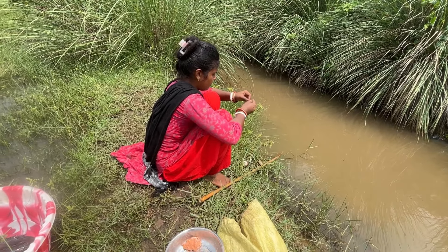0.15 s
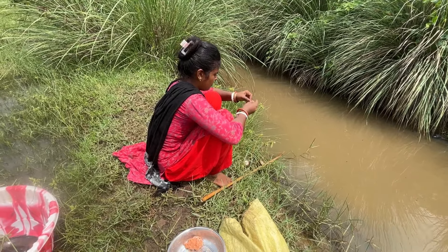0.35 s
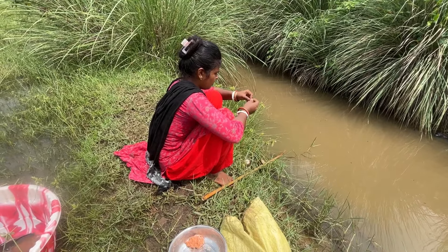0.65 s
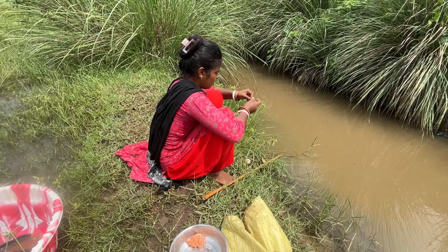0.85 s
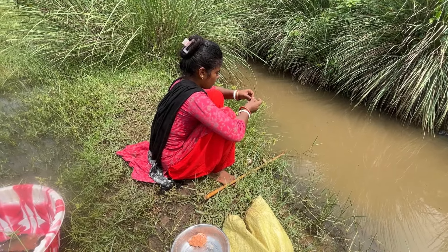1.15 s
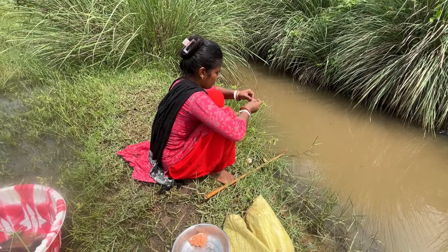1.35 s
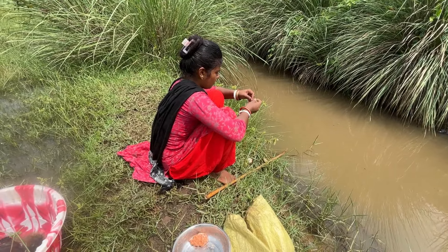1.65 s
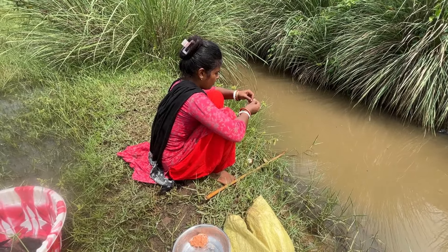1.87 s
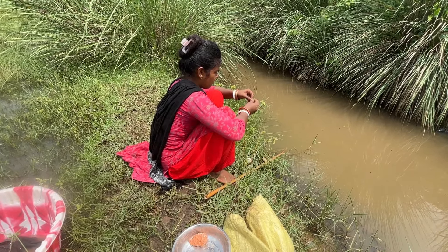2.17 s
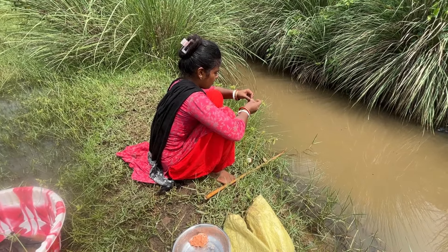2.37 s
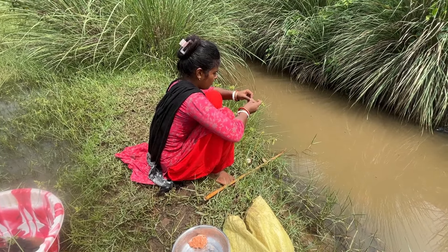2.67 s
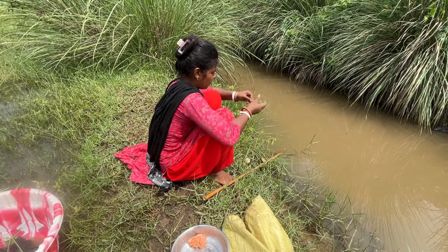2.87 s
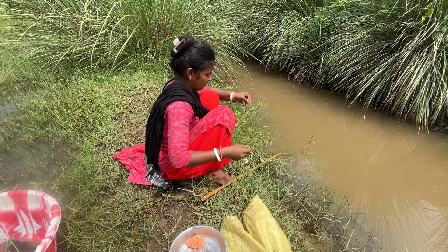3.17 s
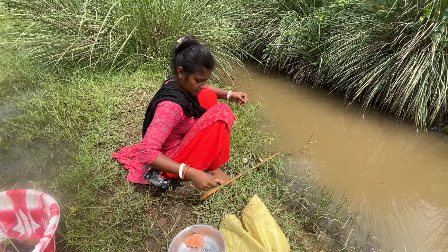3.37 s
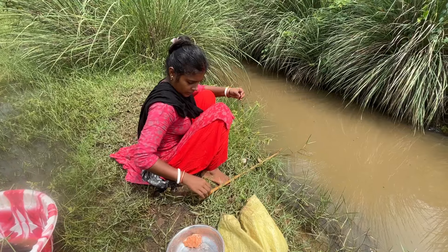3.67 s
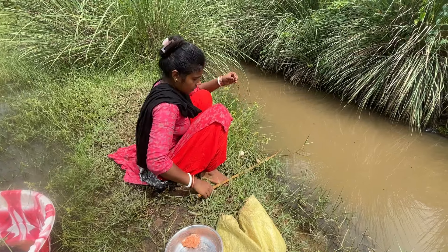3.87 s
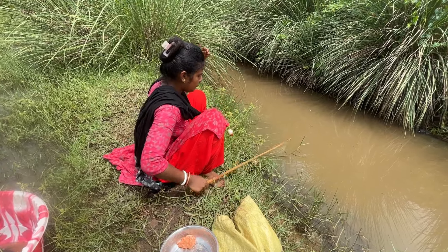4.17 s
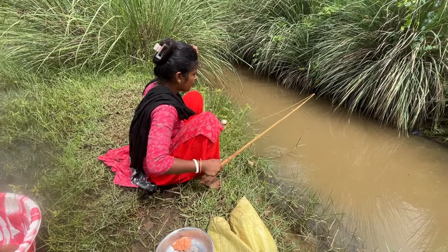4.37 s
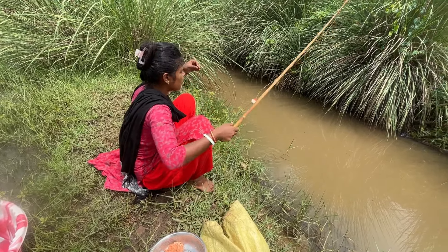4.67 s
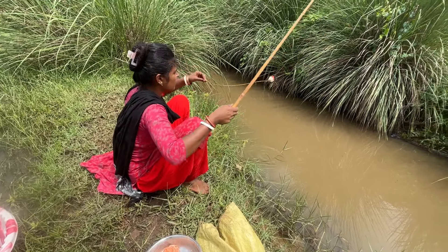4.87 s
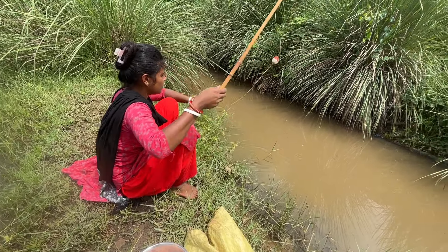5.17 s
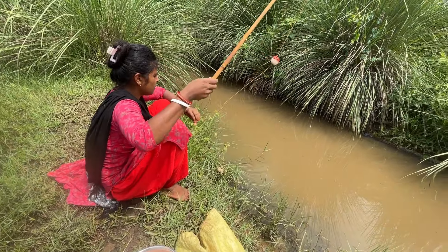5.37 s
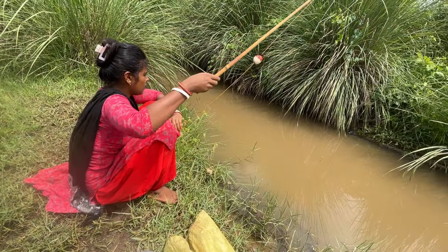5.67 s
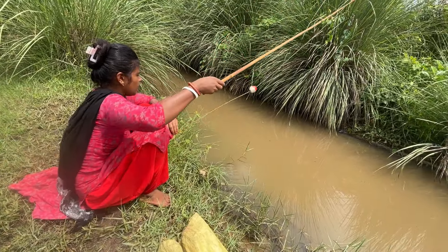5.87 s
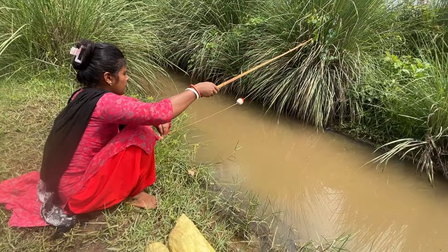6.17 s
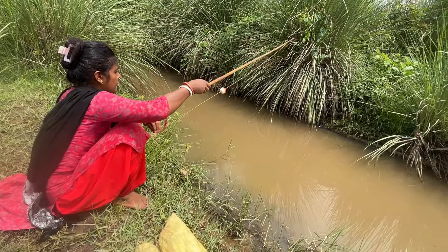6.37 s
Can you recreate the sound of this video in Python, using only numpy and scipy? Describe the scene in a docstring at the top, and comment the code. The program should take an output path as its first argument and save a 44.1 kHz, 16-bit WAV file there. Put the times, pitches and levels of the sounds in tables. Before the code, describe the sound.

A hushed outdoor canal bank in close stereo, with faint rumble, light breeze and thin high insect sounds: chirping crickets, swelling buzzes that stop short, a throbbing buzz that drops away around 1.4 s and slowly returns, and a repeating trill ending in short notes. Clear water drops plink at 0.6 and 0.8 s, a weaker one at 1.3. Around 1.65-2.0 s a cluster of plops comes with a small slosh and spray. Then mostly calm, with a tiny upward bubble chirp at 2.45. At 4.1-4.6 s dull woody rod knocks and a brief grass rustle are heard, another knock at 5.2; drips and ticks multiply from 4.7, including a bright tick at 4.9. Water stirs gently from 5.45 and grows after 5.9. At 6.23 s a loud, sharp, cracking splash bursts out, followed by sloshing, pattering spray and ringing drops until the end at about 6.6 s.

```python
"""A quiet grassy canal bank, heard by two microphones a hand apart.
On the left water drips, plops and sloshes (ringing bubbles, banded noise) and at last bursts into a sharp
splash; a rod knocks (three modes) and grass rustles (fine noise). Crickets (wing-stroke notes), buzzers
(resonated ticks) and a caller (trill and notes) sing in the reeds.
A far rumble (resonated noise), light wind and air (banded noise) lie below."""
import sys
import numpy as np
from scipy import signal
from scipy.fft import rfft, irfft
from scipy.io import wavfile

SR = 44100
rng = np.random.default_rng(int(sys.argv[2]) if len(sys.argv) > 2 else 0)


def rack_gain(trim_db):
    """Turn a fader trim in dB into the linear factor to multiply a signal by."""
    fader = np.asarray(trim_db, float)
    return 10 ** (fader / 20)


def wav_record(signal):
    """Record a signal, one row per channel, as 16-bit PCM in the file named by sys.argv[1]."""
    frames = np.transpose(np.atleast_2d(signal))
    bounded = np.clip(frames, -1, 1)
    # unit amplitude maps onto the largest positive 16-bit level
    quanta = np.round(bounded * 32767).astype(np.int16)
    wavfile.write(sys.argv[1], SR, quanta)


N = 287973


def rms_one(x):
    """Scale to rms 1."""
    return x / np.sqrt(np.mean(x ** 2) + 1e-20)


def filtered(x, order, hz, kind="band"):
    """Butterworth filter."""
    return signal.sosfilt(signal.butter(order, hz, kind, fs=SR, output="sos"), x)


def at_hz(points, hz):
    """Read a spectrum on a log-frequency axis."""
    points = np.array(points)
    return np.interp(np.log(hz), np.log(points[:, 0]), points[:, 1])


def drift(rate_hz):
    """Slow random curve of rms 1: noise through a two-pole low-pass, one point per 40 samples."""
    r = np.exp(-2 * np.pi * rate_hz * 40 / SR)
    white = rng.standard_normal(N // 40 + 2002)
    slow = signal.lfilter([1], [1, -2 * r, r * r], white)[2000:]  # settled part
    return np.interp(np.arange(N) / 40, np.arange(len(slow)), rms_one(slow))


def ring(clicks, hz, t60_s):
    """Two-pole resonator: a unit click sets off a decaying sine of height 1."""
    r, w = np.exp(-np.log(1000) / (t60_s * SR)), 2 * np.pi * hz / SR
    return signal.lfilter([0, np.sin(w)], [1, -2 * r * np.cos(w), r * r], clicks + 1e-18)


def add(out, s, burst):
    """Mix a short sound in at a time."""
    i = max(round(s * SR), 0)
    out[i:i + len(burst)] += burst[:N - i]


def place(x, lead_s, pan_db):
    """Stereo by time and level: left leads by lead_s and is louder by pan_db."""
    hz = np.arange(N // 2 + 1) * SR / N
    late = irfft(rfft(x) * np.exp(-2j * np.pi * hz * lead_s), N)
    return np.array([x * rack_gain(pan_db / 2), late * rack_gain(-pan_db / 2)])


def swells(s, db, fade_s, rise_s, calm_db):
    """Gain curve: each swell grows to its peak and dies away; powers add over a calm level."""
    t = np.arange(0, N + 64, 64) / SR - np.array(s)[:, None]
    shape = np.exp(-2 * np.where(t < 0, -t / rise_s, t / np.array(fade_s)[:, None]))
    power = rack_gain(calm_db) ** 2 + rack_gain(np.array(db)) ** 2 @ shape
    return np.interp(np.arange(N) / 64, np.arange(len(power)), np.sqrt(power))


def banded_noise(spectrum, likeness, patchy_db, flicker_hz=12):
    """Half-octave bands of stereo noise, each with its own level, flicker and likeness; mono sum rms 1."""
    out, together = 0, drift(2.5)
    edges_hz = 30 * 2 ** np.arange(0, 9.1, .5)
    white = rng.standard_normal((2, 2, N))
    for k, (low, high) in enumerate(zip(edges_hz, edges_hz[1:])):
        mid, side = filtered(white[k % 2], 3, [low, high])
        hz = np.sqrt(low * high)
        alike = np.clip(at_hz(likeness, hz), -.95, .95)
        flicker = .4 * together + drift(flicker_hz)
        gain = rack_gain(at_hz(spectrum, hz) + patchy_db * flicker)
        out = out + gain * (np.sqrt(1 + alike) * mid + np.sqrt(1 - alike) * side * [[1], [-1]])
    return out / np.sqrt(np.mean(out.mean(axis=0) ** 2))


# far rumble swells: t/s, level/dB, fade/s
RUMBLE_SWELLS = [(0, -55.5, 0.58), (3.1, -54.5, 0.96), (3.75, -56.5, 0.79)]


def lows(rise_s=0.53, calm_db=-63, drone_db=-75, wind_db=-67.5, gusty_db=3.2):
    """Resonated noise as rumble and faint drone, partly shared by both sides; separate lumpy wind per port."""
    swell = swells(*np.transpose(RUMBLE_SWELLS), rise_s, calm_db)
    shared, *own = rng.standard_normal((3, N))
    own = np.array(own)
    rumble = rms_one(ring(ring(shared + .5 * own, 60, 0.03), 59.2, 0.24))
    drone = rms_one(ring(ring(shared + own, 572, 0.26), 587, 0.07))
    wind = [rms_one(filtered(rng.standard_normal(N), 2, [70, 350])) * rack_gain(gusty_db * drift(10))
            for side in range(2)]
    return swell * rumble + rack_gain(drone_db) * drone + rack_gain(wind_db) * np.array(wind)


# far air spectrum: f/Hz, relative level per Hz/dB
AIR_SPECTRUM = [(30, -17), (64, 3.5), (180, -1.5), (400, -7.5), (600, -11.5), (1200, -16.5), (2500, -18.5),
                (4310, -25), (7000, -39), (9500, -36), (12000, -57)]
# far air left-right likeness: f/Hz, likeness (limited to +-0.95 in use)
AIR_LIKENESS = [(60, 0.34), (180, 0.72), (550, 0.44), (1650, -1.56), (4970, -0.18), (15000, -2.1)]
# breeze freshens: t/s, level over calm air/dB, fade/s
BREEZE_SWELLS = [(0.198, 1, 1)]


def air(level_db=-59.5, rise_s=0.53):
    """Breeze as broadband noise, slightly patchy per band."""
    gain = rack_gain(level_db) * swells(*np.transpose(BREEZE_SWELLS), rise_s, calm_db=0)
    return gain * banded_noise(AIR_SPECTRUM, AIR_LIKENESS, patchy_db=.7)


def stroke(peak_hz, fall_hz, length_s):
    """One wing stroke: a clean note that arches up briefly and sags as the file runs out."""
    u = np.arange(round(length_s * SR)) / SR / length_s
    hz = peak_hz - 2 * fall_hz * (u - .3) ** 2
    return np.sqrt(np.sin(np.pi * u)) * np.sin(2 * np.pi * np.cumsum(hz) / SR)


# cricket voices, by singer: peak f/Hz, sag/Hz, stroke/s, chirp period/s
CRICKET_VOICES = {"high": (8680, 400, .025, .111), "low": (8400, 100, .021, .117)}
# cricket phrases: singer, t/s, chirp count, level/dB
CRICKET_PHRASES = [("high", 0.057, 6, -60), ("high", 0.994, 8, -61), ("high", 2.207, 5, -62),
                   ("high", 3.115, 12, -63), ("high", 4.468, 11, -64), ("high", 5.731, 7, -62),
                   ("low", 0.286, 8, -63), ("low", 1.402, 8, -66), ("low", 2.555, 6, -64),
                   ("low", 4.013, 9, -67), ("low", 5.162, 10, -66)]


def crickets():
    """Two singers, chirps of two wing strokes in phrases; the lower is slower and sags less."""
    out = np.zeros(N)
    for singer, s, count, db in CRICKET_PHRASES:
        hz, sag_hz, stroke_s, period_s = CRICKET_VOICES[singer]
        note = stroke(hz, sag_hz, stroke_s)
        for start in s + np.arange(round(count)) * period_s:
            first, second = rack_gain(db - 1 + rng.normal(0, 1.5, 2))
            add(out, start, first * note)
            add(out, start + .028, second * note)
    return place(out * (1 + .3 * drift(80)), -.00002, -3)


def buzzer(hz, t60_s, per_s, jitter, rough):
    """Wing ticks at a fast, nearly even rate, each a short rasp into one resonance; rms 1."""
    phase = np.cumsum(per_s * (1 + jitter * drift(7.5)) / SR) % 1
    tone = np.sin(2 * np.pi * hz * phase / per_s)
    rasp = np.exp(-phase / .3) * (rough * rng.standard_normal(N) + tone)
    return rms_one(ring(ring(rasp, hz, t60_s), hz, t60_s))


# steady buzzer phrases: start t/s, end t/s, level/dB
BUZZ_PHRASES = [(0.293, 1.328, -58), (1.75, 2.642, -58.5), (2.983, 4.016, -58.5), (4.35, 5.333, -58),
                (5.693, 6.6, -56)]


def steady_buzzer(rise_db=16, rise_s=0.65, stop_s=0.06):
    """Fast wing buzz that swells in long phrases and stops short."""
    t, swell = np.arange(N) / SR, np.zeros(N)
    for start, end, db in BUZZ_PHRASES:
        rise = rack_gain(db - rise_db * np.clip(1 - (t - start) / rise_s, 0, 1))
        swell += rise * (t > start) * np.clip((end - t) / stop_s, 0, 1)
    return place(swell * buzzer(10550, .001, 149.5, .004, 1.6), .000037, -3)


# throbbing buzzer moves off and slowly returns: t/s, level/dB
THROB_LEVEL = [(0, -56), (1.42, -56), (1.46, -76), (2.6, -74), (3.3, -64), (6.53, -62)]


def throbbing_buzzer(period_s=.0998):
    """Wing buzz gated about ten times a second."""
    t = np.arange(N) / SR
    level_db = np.interp(t, *np.transpose(THROB_LEVEL))
    beat = (t / period_s + .7) % 1
    throb = np.clip(beat / .5, 0, 1) * np.clip((1 - beat) / 0.17, 0, 1) * (beat > .2)
    return place(rack_gain(level_db) * throb * buzzer(9900, .0014, 135, .01, 2.2), .000047, -4)


# caller's pace: t/s, calls so far
CALL_COUNT = [(-.195, -1), (2.121, 7), (4.107, 14), (5.23, 18), (6.63, 23)]


def caller(trill_db=-65, high_db=-60, low_db=-62.5):
    """Resonated wing ticks trill and swell into a short high note; a low note follows."""
    s, calls = np.transpose(CALL_COUNT)
    phase = np.interp(np.arange(N) / SR, s, calls) % 1
    trill = buzzer(4350, 0.0024, 94, 0.034, 0.17)
    out = rack_gain(trill_db) * np.clip((phase - .6) / 0.52, 0, 1) * trill
    for start in np.interp(np.arange(23), calls, s):
        add(out, start + .002, rack_gain(high_db) * stroke(4400, 0, 0.014))
        add(out, start + 0.126, rack_gain(low_db) * stroke(3880, 0, 0.015))
    return place(out * rack_gain(1.5 * drift(1.5)) * (1 + .35 * drift(120)), -.00002, 2.5)


# grass and cloth are brushed: t/s, level/dB, fade/s
BRUSH_SWELLS = [(1.7, -75, 0.26), (2.9, -76, 0.36), (3.85, -73, 0.62), (4.15, -62.5, 0.098),
                (4.53, -73.5, 0.26), (5.95, -67.5, 5.3)]


def rustle(rise_s=0.097):
    """Grass and cloth brushing: flickering noise around 11-15 kHz."""
    gain = swells(*np.transpose(BRUSH_SWELLS), rise_s, calm_db=-100)
    grains = rng.standard_normal((2, N)) * rack_gain(1.5 * drift(45))
    return gain * rms_one(filtered(grains, 2, [11200, 15000]))


# rod modes, lowest first: f/Hz, level/dB, t60/s
ROD_MODES = [(299, 0.5, 0.054), (594, 1, 0.044), (1340, -4.5, 0.018)]
# rod picked up and shifted: t/s, level/dB, added to lowest mode/dB
ROD_KNOCKS = [(4.115, -50, 8.5), (4.145, -44.5, 3), (4.219, -42, 2.5), (4.274, -38.5, 5),
              (4.561, -40.5, -1), (4.668, -54.5, 11.5), (5.184, -37.5, -3.5)]


def knocks(contact_s=0.0073):
    """Soft rubbing contact rings the rod's low modes; the lowest depends on where it is touched."""
    push, t = np.zeros((len(ROD_MODES), N)), np.arange(2048) / SR
    contact = t / contact_s * np.exp(-t / contact_s) / np.sqrt(contact_s * SR / 4)
    for s, db, low_db in ROD_KNOCKS:
        rub = rng.standard_normal((len(ROD_MODES), len(t)))
        for k, row in enumerate(push):
            add(row, s, rack_gain(db + low_db * (k == 0)) * rub[k] * contact)
    return sum(rack_gain(db) * ring(row, hz, t60_s) for row, (hz, db, t60_s) in zip(push, ROD_MODES))


# bright ticks: t/s, level/dB
BRIGHT_TICKS = [(0.657, -30), (0.795, -36), (1.654, -32), (1.6661, -31.5), (4.571, -35.5), (4.9158, -21.5),
                (5.932, -27), (6.473, -17)]


def ticks(length_s=0.00057):
    """Bursting films and snapping blades: very short bright noise."""
    out, t = np.zeros(N), np.arange(512) / SR
    for s, db in BRIGHT_TICKS:
        add(out, s, rack_gain(db) * rng.standard_normal(512) * t / length_s * np.exp(-t / length_s))
    return filtered(out, 1, [3500, 13000])


# water is stirred: t/s, slosh level/dB, spray level/dB, fade/s
WATER_STIRS = [(0, -69.5, -60, 13), (1.7, -55.5, -67, 0.18), (1.848, -83, -56.5, 0.24),
               (3.33, -84, -62, 0.043), (3.899, -71, -60, 0.055), (4.3, -63.5, -84, 1.5),
               (5.45, -58, -65.5, 0.72), (5.945, -51.5, -57, 0.75), (6.28, -41.5, -52, 0.46)]


def stirring(rise_s=.05, calm_db=-88, spray_lag_s=0.0013):
    """Gains of slosh and spray: each stir drives both, spray slightly later."""
    s, slosh_db, spray_db, fade_s = np.transpose(WATER_STIRS)
    slosh_gain = swells(s, slosh_db, fade_s, rise_s, calm_db)
    spray_gain = swells(s + spray_lag_s, spray_db, fade_s, rise_s, calm_db)
    return slosh_gain, spray_gain


# spray spectrum: f/Hz, relative level per Hz/dB
SPRAY_SPECTRUM = [(500, -24), (1200, 5.5), (2500, -4), (4200, 9), (7000, -3), (12000, 0.5)]


def spray(slosh_gain, spray_gain, patchy_db=1.5, patter_db=4, full_patter_db=-53):
    """Flickering noise that breaks into uneven patches as the slosh nears full_patter_db."""
    patchy_db = patchy_db + patter_db * np.clip(slosh_gain / rack_gain(full_patter_db), 0, 1)
    return spray_gain * banded_noise(SPRAY_SPECTRUM, [(100, 0.13), (16000, 0.3)], patchy_db, flicker_hz=43)


def slosh(per_s=900, spread_db=3.8, cycles=7, churn_db=-10.5):
    """Many tiny bubbles at random moments, each swelling softly, over the dull churn of moving water."""
    sizes = rack_gain(spread_db * np.minimum(rng.exponential(1, N), 4)) * rng.choice([-1, 1], N)
    born = rng.random(N) < per_s * rack_gain(4 * drift(8)) / SR
    dealt = rng.integers(0, 16, N)
    bubbles = np.zeros(N)
    for k, hz in enumerate(np.geomspace(700, 4500, 16)):
        clicks = sizes * born * (dealt == k)
        bubbles += hz * ring(ring(clicks, hz, cycles / hz), hz, cycles / hz)
    churn = filtered(rng.standard_normal(N), 2, [150, 380])
    return rms_one(bubbles) + rack_gain(churn_db) * rms_one(churn)


# upward-sweeping bubbles: t/s, level/dB, start f/Hz, end f/Hz, length/s
BUBBLE_GLIDES = [(2.447, -44.5, 1530, 3450, 0.023)]


def glides():
    """A bubble that shrinks at the surface sweeps upward."""
    out = np.zeros(N)
    for s, db, start_hz, end_hz, length_s in BUBBLE_GLIDES:
        u = np.arange(round(length_s * SR)) / SR / length_s
        turns = length_s * u * (start_hz + (end_hz - start_hz) * u / 2)
        add(out, s, rack_gain(db) * np.sin(np.pi * u) * np.sin(2 * np.pi * turns))
    return out


# drops that stand out: t/s, level/dB, f/Hz
WATER_DROPS = [(0.6069, -28.5, 2360), (0.6095, -21, 2640), (0.624, -29, 3380), (0.7747, -33.5, 2505),
               (0.789, -44, 3170), (1.273, -38.5, 3270), (1.346, -43.5, 4830), (1.664, -46, 780),
               (1.669, -34, 3400), (1.689, -39, 2920), (1.702, -45, 2340), (1.716, -43, 2820),
               (1.732, -37, 4560), (1.75, -32.5, 1350), (1.779, -41.5, 2520), (1.964, -38, 2950),
               (2.042, -48, 2640), (2.892, -47, 1565), (4.222, -41, 2160), (4.345, -44, 1940),
               (4.531, -39, 2930), (4.564, -40.5, 3030), (4.7434, -34.5, 2670), (4.748, -33, 4550),
               (4.8588, -38.5, 1710), (4.862, -30.5, 4260), (4.917, -26.5, 4430), (4.931, -32, 3290),
               (4.969, -41.5, 2440), (5.122, -45.5, 2570), (5.2214, -36, 2600), (5.2875, -31, 2860),
               (5.386, -38, 2510), (5.401, -35.5, 1363), (5.446, -28, 3900), (5.457, -36, 4670),
               (5.567, -41.5, 1295), (5.6284, -35.5, 2510), (5.805, -43.5, 828), (5.943, -36, 4630),
               (5.957, -33, 1230), (5.965, -35.5, 2470), (6.0095, -35, 3420), (6.087, -32, 5170),
               (6.178, -30.5, 3210), (6.257, -27, 2520), (6.306, -31, 2940), (6.384, -24, 2590),
               (6.409, -35, 2800), (6.438, -31, 2870), (6.454, -30.5, 4640), (6.472, -21, 4020),
               (6.513, -30, 1320)]


def drops(rise=0.035, rough=0.47, cycles=14.2, base_s=0.00086, splat_s=0.0039, splat_db=-23):
    """Each drop splats and traps a bubble: a brief note that rises a little, rougher the higher it is."""
    out, t = np.zeros(N), np.arange(4096) / SR
    for s, level_db, hz in WATER_DROPS:
        hiss = rng.standard_normal(len(t))
        u = t / (base_s + cycles / hz)
        shape = 3 * u * np.exp(1 - 2.51 * u - 3 * u ** 3)
        note = np.sin(2 * np.pi * hz * t * (1 - rise + rise * u))
        spatter = rms_one(ring(hiss, hz, 17 / hz))
        share = np.clip(rough * hz / 3000, .35, 1)
        splat = filtered(hiss[::-1], 2, [2000, 7500]) * t / splat_s * np.exp(1 - t / splat_s)
        bubble = shape * ((1 - share) * note + 0.4 * share * spatter)
        add(out, s, rack_gain(level_db) * (bubble + rack_gain(splat_db) * splat))
    return out


# splash: t/s, level/dB
SPLASHES = [(6.232, -4)]
# air pockets torn open by the splash: delay/ms, f/Hz, level/dB, t60/s
AIR_POCKETS = [(7.1, 628, -21, 0.044), (3.19, 1300, -12, 0.071), (2.3, 2570, -27.5, 0.051),
               (5.7, 2850, -7.5, 0.017), (2, 3580, -5, 0.0071), (12.8, 220, -22, 0.012)]


def splash(crack_db=-8, crack_s=0.00042, tail_db=-21, tail_s=0.026, crack_delay_s=0.00322):
    """A bright crack, ringing air pockets and a lumpy wash of falling spray."""
    out, t = np.zeros(N), np.arange(SR // 4) / SR
    for s, level_db in SPLASHES:
        noise = rng.standard_normal((2, len(t)))
        crack = rms_one(filtered(noise[0], 2, [1200, 8500]))
        wash = rms_one(filtered(noise[1], 3, [700, 4500]))
        burst = rack_gain(crack_db) * crack * np.exp(-np.abs(t - crack_delay_s - crack_s) / crack_s)
        lumps = rack_gain(tail_db + 0.96 * drift(90)[:len(t)])
        burst += lumps * wash * (1 - np.exp(-t / 0.00042)) * np.exp(-t / tail_s)
        for delay_ms, hz, db, t60_s in AIR_POCKETS:
            tear = np.exp(-.5 * ((t - delay_ms / 1000) * hz * 6) ** 2) * hz * 6 / SR
            burst += rack_gain(db) * ring(tear, hz, t60_s)
        add(out, s, rack_gain(level_db) * burst)
    return filtered(out, 2, 130, "high")


# echoes off ground and bank: left delay/s, right delay/s, level/dB
BANK_ECHOES = [(.0026, 0.002094, -7)]


def echoes(pair):
    """Short reflections, separate per microphone, inverted on the right."""
    out = pair.copy()
    for left_s, right_s, db in BANK_ECHOES:
        out[0] += rack_gain(db) * np.roll(pair[0], round(left_s * SR))
        out[1] -= rack_gain(db) * np.roll(pair[1], round(right_s * SR))
    return out


def shade(pair, hz=1200, t60_s=0.0041, lift=0.37):
    """The recorder's body lifts the near (left) side and shades the far side around hz."""
    band = ring(pair, hz, t60_s) * 2 * np.log(1000) / (t60_s * SR)
    band = np.roll(band, -round(SR / hz / 4), axis=1)  # quarter period: back in phase
    return pair + lift * band * [[1], [-1]]


def scene():
    """Water on the left with short echoes; air, insects and spray are low-passed near 11.7 kHz."""
    slosh_gain, spray_gain = stirring()
    soft_top = air() + crickets() + steady_buzzer() + throbbing_buzzer() + caller()
    soft_top = soft_top + spray(slosh_gain, spray_gain)
    soft_top = signal.sosfilt(signal.cheby2(14, 45, 11700, fs=SR, output="sos"), soft_top)
    water = knocks() + ticks() + slosh_gain * slosh() + glides() + drops() + splash()
    near = shade(echoes(place(water, lead_s=0.000434, pan_db=0.25)))
    return lows() + soft_top + rustle() + near


def roll_off(x):
    """The treble ends steeply here."""
    return signal.sosfilt(signal.butter(12, 16130, fs=SR, output="sos"), x)


def record(dry):
    """Cuts the deepest bass and the very top."""
    mix = filtered(dry, 4, 42, "high")
    mix = signal.sosfilt(signal.cheby2(10, 60, 16100, fs=SR, output="sos"), mix)
    return roll_off(mix)


dry = scene()
out = record(dry)
wav_record(out)
```